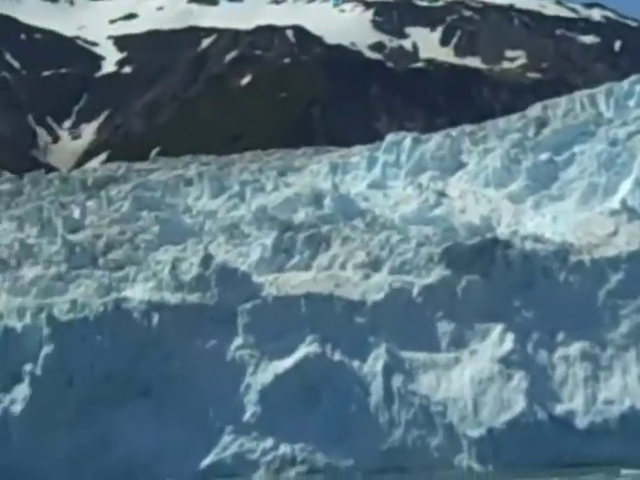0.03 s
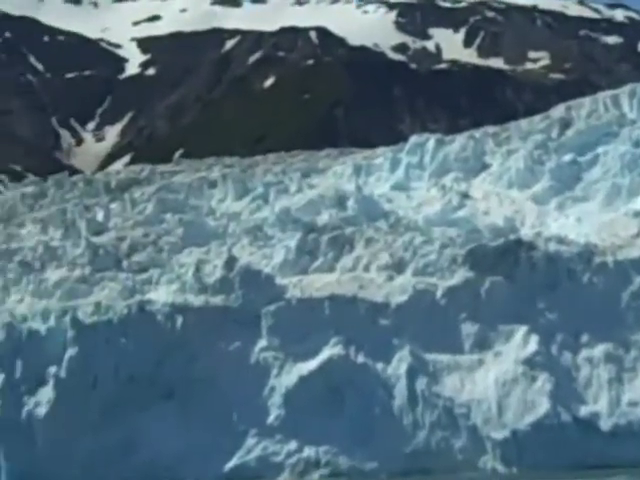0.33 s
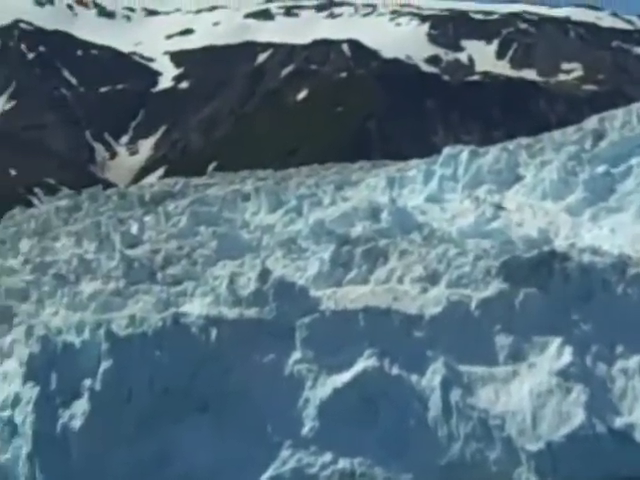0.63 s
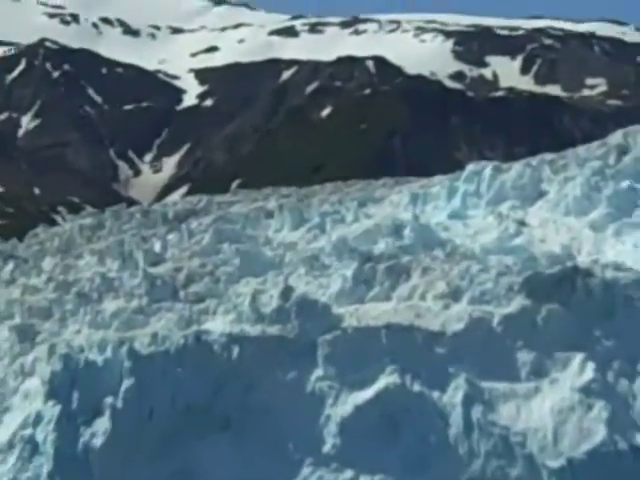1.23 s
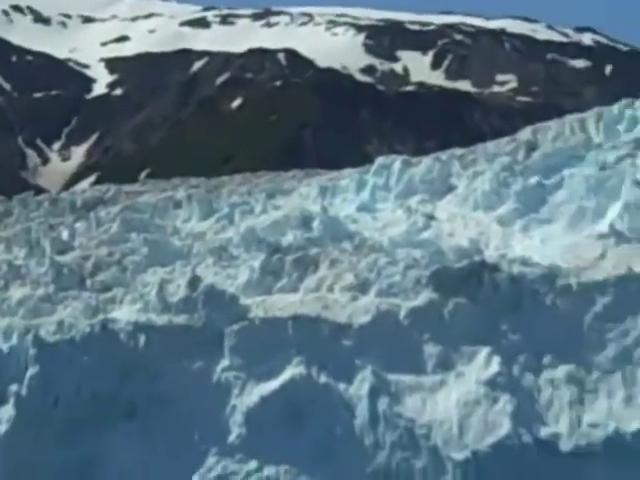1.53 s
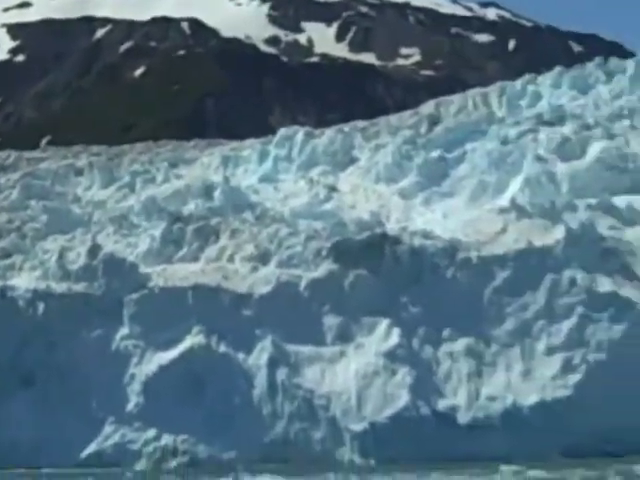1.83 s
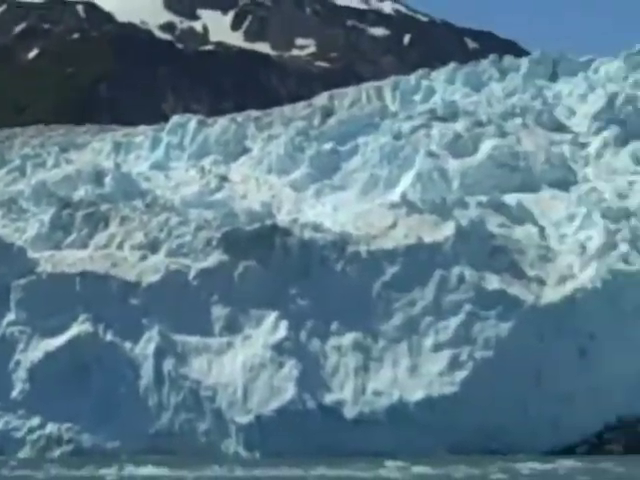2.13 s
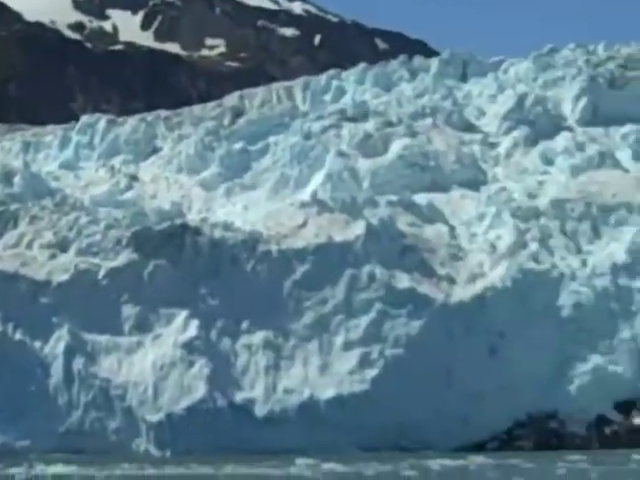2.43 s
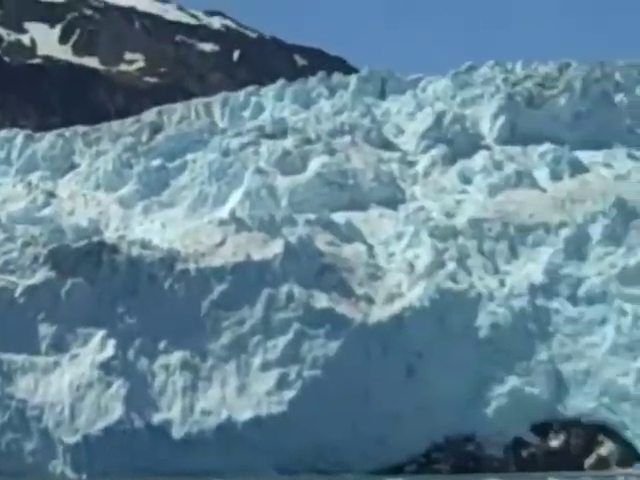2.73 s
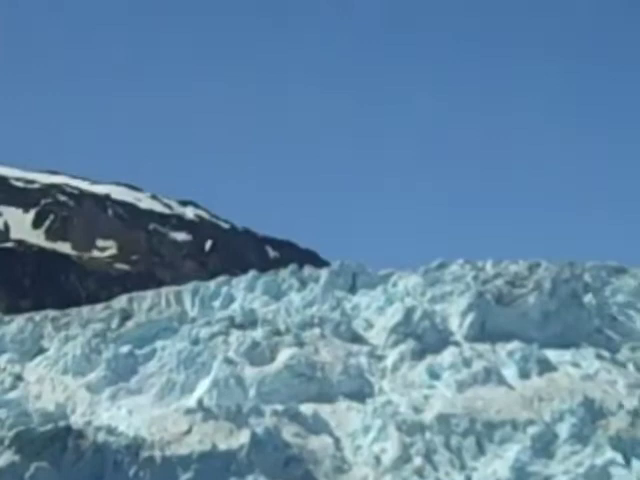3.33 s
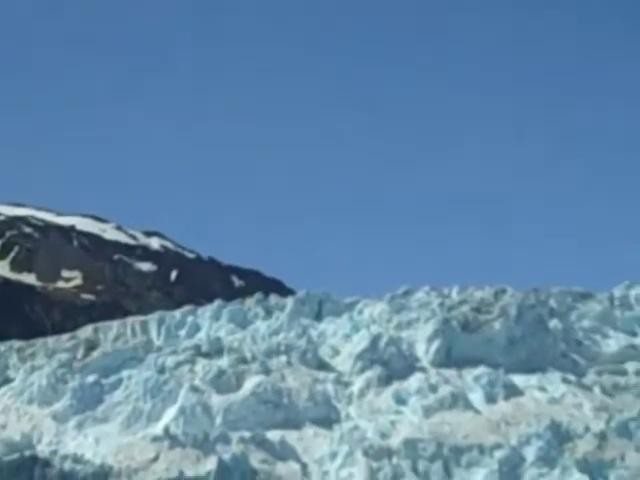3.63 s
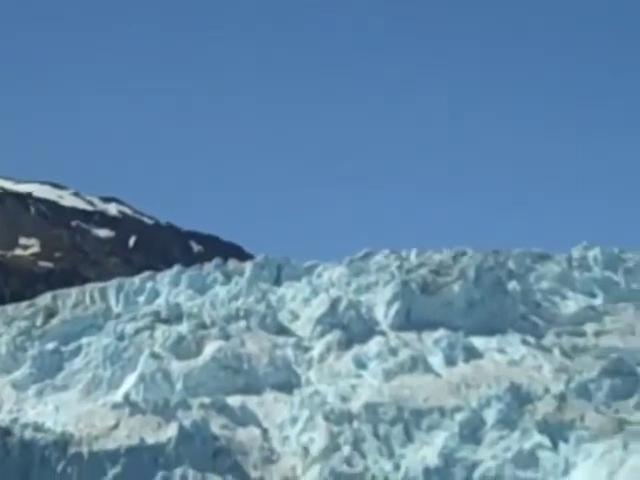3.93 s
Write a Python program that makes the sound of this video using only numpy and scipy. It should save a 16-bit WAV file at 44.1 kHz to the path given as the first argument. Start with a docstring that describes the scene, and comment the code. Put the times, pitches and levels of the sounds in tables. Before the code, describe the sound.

Wind rumbles on the microphone over distant water and faint ticking ice.

```python
"""Wind buffets a small microphone: a fluttering rumble, with single eddies thumping on the port,
strongest in the last second. The microphone stands on open water before a glacier. Close by, small
waves slosh and floating ice ticks; farther out the ice crackles faintly, and behind it all lies
the even wash of distant water."""
import sys
import numpy as np
from scipy import signal
from scipy.io import wavfile

SR = 44100
rng = np.random.default_rng(int(sys.argv[2]) if len(sys.argv) > 2 else 0)


def persist_wave(psi):
    """Save psi, clipped to +-1, as 16-bit WAV."""
    counts = np.round(np.clip(psi, -1, 1) * 32767).astype(np.int16)
    wavfile.write(sys.argv[1], SR, np.atleast_2d(counts).T)


N = 176400
TIME = np.arange(N) / SR

# wind strength at the microphone: t/s, level/dB
GUST_LEVEL = [(0, -53.5), (.12, -57), (.19, -55.5), (.26, -54), (.33, -57.5), (.38, -55), (.51, -58.5),
              (.59, -55), (.72, -58), (.8, -51), (.88, -61), (.97, -51), (1.07, -57.5), (1.13, -54),
              (1.22, -59), (1.28, -54.5), (1.38, -60.5), (1.44, -53.5), (1.57, -51.5), (1.63, -60.5),
              (1.8, -61.5), (1.93, -57.5), (2.01, -64), (2.11, -52.5), (2.2, -51.5), (2.3, -57),
              (2.39, -51.5), (2.47, -56.5), (2.53, -52), (2.59, -56.5), (2.68, -62.5), (2.77, -67),
              (2.86, -54.5), (2.97, -53), (3.08, -48), (3.14, -46.5), (3.23, -48.5), (3.32, -46.5),
              (3.345, -56.5), (3.43, -49), (3.57, -47), (3.61, -44.5), (3.7, -44.5), (3.82, -45),
              (3.88, -48.5), (4, -50)]
# colour of the wind rumble: f/Hz, relative density/dB
RUMBLE_SPECTRUM = [(25, -26.5), (55, -18.5), (92, -3.5), (122, -2.5), (170, 2.5), (260, -2), (420, -8),
                   (560, -13.5), (750, -15), (1400, -25), (3000, -45.5), (8000, -56.5)]
# swell of the rumble's deep end: t/s, gain/dB
DEEP_SWELL = [(0, 0.5), (.6, 4.5), (.9, -4), (1.35, -5.5), (1.7, 1), (2.15, 8), (2.45, 5), (2.7, -9),
              (3.1, -2), (3.65, -5.5), (4, 3)]
# strong eddies crossing the port: t/s, depth of the pressure dip/dB, half width/ms
STRONG_EDDIES = [(.074, -39, 1.2), (.462, -33, 1.14), (.656, -39, 1.3), (.761, -37.5, 1.35),
                 (.793, -38.5, 1.24), (1.024, -36.5, 1.4), (1.040, -36.5, 1.26), (1.880, -35.5, 1.07),
                 (2.091, -35.5, 0.93), (2.112, -37, 1.35), (2.137, -33, 1.73), (2.224, -34.5, 1.14),
                 (2.256, -30.5, 1.17), (2.264, -31.5, 0.39), (2.378, -38.5, 1.9), (2.413, -41.5, 1.4),
                 (3.030, -34, 1.1), (3.072, -35, 1.07), (3.102, -37, 1.5), (3.174, -31, .78),
                 (3.207, -31, 0.58), (3.218, -37, 1.7), (3.279, -33.5, 0.42), (3.317, -32.5, 0.41),
                 (3.322, -34, 0.21), (3.326, -35.5, 0.31), (3.384, -31, .62), (3.396, -32, 0.2),
                 (3.397, -32.5, 1.63), (3.505, -32.5, 0.28), (3.525, -33.5, 0.5), (3.558, -40, 2.7),
                 (3.616, -36, 1.2), (3.640, -31.5, .4), (3.653, -27.5, 1.2), (3.669, -34.5, 0.19),
                 (3.687, -30.5, 1.5), (3.695, -29.5, 1.55), (3.706, -34.5, 1.25), (3.718, -30, .75),
                 (3.731, -36, 1.5), (3.767, -26.5, 0.53), (3.774, -31, 0.61), (3.790, -26.5, 1.02),
                 (3.798, -33, 0.41), (3.832, -31.5, 1.03), (3.836, -28, 0.3), (3.916, -35.5, 1.3),
                 (3.997, -31.5, 0.58)]
# small waves nearby: t/s, level/dB, length/s
NEAR_WAVES = [(0.719, -50.5, 0.015), (0.792, -52.5, 0.023), (1.436, -54, 0.023), (1.598, -48, 0.009),
              (1.708, -56, 0.042), (1.843, -51, 0.023), (2.253, -53.5, 0.05), (2.48, -59.5, 0.17),
              (2.82, -56.5, 0.48), (2.994, -58, 0.042)]
# colour of their splashing: f/Hz, relative density/dB
SLOSH_SPECTRUM = [(100, -32.5), (400, 0.5), (620, 7), (900, -0.5), (1400, 4), (2200, -23.5), (4000, -20),
                  (8000, -40.5)]
# pops close by, from the nearby ice and, at 2.78-2.86 s, from the fizz of a splashing wave: t/s, ring level/dB,
# f/Hz, snap relative to the ring/dB
NEAR_TICKS = [(.070, -60, 5900, -14), (0.541, -51.5, 3500, -2), (0.724, -45.5, 1400, -12),
              (1.256, -62, 6200, 4), (1.498, -49, 3660, -22), (1.601, -52, 3020, -12),
              (1.809, -50.5, 3460, -18), (2.632, -46.5, 2700, -1), (2.644, -62, 6500, 4),
              (2.778, -55, 3500, -16), (2.852, -56, 4500, -16), (2.864, -61, 5670, -18),
              (2.971, -62, 6700, 1), (3.306, -51, 3330, 2), (3.570, -43, 2930, -20), (3.855, -58, 5300, 0),
              (3.978, -60, 5500, 3)]
# colour of the distant water: f/Hz, relative density/dB
WASH_SPECTRUM = [(25, -13), (70, -9), (160, -3), (300, 0.5), (470, 0), (620, 2), (800, -1.5), (1200, -1.95),
                 (2000, -7.5), (3200, -14), (5000, -23.5), (7400, -32.5), (8600, -40.5)]
# loudness of the distant water: t/s, level/dB
FAR_WATER_LEVEL = [(0, -55.5), (.7, -55), (1.2, -56), (1.7, -55), (2.2, -54.5), (2.6, -55.5), (3.0, -54.5),
                   (4, -54.5)]

GUST_MEAN_DB, RUMBLE_GAIN_DB = -49.5, 2.0
GUST_BRIGHTENS, PIVOT_HZ = 0.21, 190   # dB per octave about the pivot, for each dB of gust
FLUTTER_DB, FLUTTER_PER_S, DEEP_BELOW_HZ = 2, 63, 116
SMALL_EDDIES_PER_S, SMALL_EDDY_ABOVE_GUST_DB, SMALL_EDDY_MS = 90, 1, 0.52
PORT_LOW_CUT_HZ = 90
TICK_RISE_S, TICK_RING_S, TICK_SNAP_S = 0.00056, 0.00057, 0.0024
CRACKLES_PER_S, CRACKLE_BASE_DB, CRACKLE_SPREAD_DB, CRACKLE_DB_PER_OCTAVE = 130, -61, 4, -1


def wind_rumble(gust_db):
    """Turbulence on the port flutters in all bands at once and brightens as the wind rises."""
    drive_db = gust_db - GUST_MEAN_DB + FLUTTER_DB * drift(FLUTTER_PER_S)
    deep_db = in_time(DEEP_SWELL)   # the deep end swells on its own
    out = 0
    for hz, band in zip(*noise_bands(RUMBLE_SPECTRUM)):
        sensitivity = 1 + GUST_BRIGHTENS * np.clip(np.log2(hz / PIVOT_HZ), -2, 2)
        deep_share = 1 / (1 + (hz / DEEP_BELOW_HZ) ** 6)
        out = out + band * from_db(sensitivity * drive_db + deep_share * deep_db)
    return from_db(GUST_MEAN_DB + RUMBLE_GAIN_DB) * out


def eddies(gust_db):
    """A vortex on the port is a pressure dip between two small rises: wide ones thump, narrow slap."""
    gap, strength, width = rng.random((400, 3)).T
    times = np.cumsum(-np.log(gap)) / SMALL_EDDIES_PER_S
    depths_db = np.interp(times, TIME, gust_db) + SMALL_EDDY_ABOVE_GUST_DB + 6 * (strength - .5)
    small_eddies = list(zip(times, depths_db, SMALL_EDDY_MS * 4 ** (width - .5)))
    out, ms = np.zeros(N), np.arange(-15, 15, 1000 / SR)
    for s, db, half_width_ms in list(STRONG_EDDIES) + small_eddies:
        offset = ms / half_width_ms
        dip = (offset ** 2 - 1) * np.exp(-.5 * offset ** 2)
        add(out, s - len(ms) / 2 / SR, from_db(db) * dip)
    return signal.sosfilt(signal.butter(2, PORT_LOW_CUT_HZ, "high", fs=SR, output="sos"), out)


def sloshes():
    """Each small wave near the microphone is a brief swell of mid-range splashing."""
    swell = sum(from_db(db) * np.exp(-(2 * (TIME - s) / length) ** 2) for s, db, length in NEAR_WAVES)
    _, bands = noise_bands(SLOSH_SPECTRUM)
    return swell * bands.sum(0)


def near_ticks():
    """Floating ice and splashing water pop close by: a short ring and a snap, faint for bubbles and strong for
    cracks."""
    out, t = np.zeros(N), TIME[:SR // 40]
    swell = (1 - np.exp(-(t / TICK_RISE_S) ** 2)) * np.exp(-t / TICK_RING_S)
    for s, db, hz, snap_db in NEAR_TICKS:
        tone = swell / swell.max() * np.sin(2 * np.pi * hz * t)
        burst = rng.standard_normal(len(t)) * np.exp(-t / TICK_SNAP_S)
        snap = signal.sosfilt(signal.butter(1, [hz / 2, hz * 1.4], "band", fs=SR, output="sos"), burst)
        add(out, s, from_db(db) * (tone + from_db(snap_db) * snap))
    return out


def ice_crackle():
    """Ice farther out pops at random, each pop ringing briefly, the high ones fainter."""
    levels_db = CRACKLE_BASE_DB + CRACKLE_SPREAD_DB * np.minimum(rng.exponential(1, N), 4)
    polarity = rng.choice([-1, 1], N)
    pops = from_db(levels_db) * polarity * (rng.random(N) < CRACKLES_PER_S / SR)
    pitches_hz = np.geomspace(900, 5500, 20)
    pitch_index = rng.integers(0, len(pitches_hz), N)
    gains = from_db(CRACKLE_DB_PER_OCTAVE * np.log2(pitches_hz / pitches_hz.mean()))
    return sum(gains[k] * ring(pops * (pitch_index == k), hz, cycles=13)
               for k, hz in enumerate(pitches_hz))


def distant_wash(waver_db=1.01, waver_per_s=9):
    """Far water arrives as an even rush whose bands each waver a little."""
    _, bands = noise_bands(WASH_SPECTRUM)
    rush = sum(band * from_db(waver_db * drift(waver_per_s)) for band in bands)
    return from_db(in_time(FAR_WATER_LEVEL)) * rush


def from_db(db):
    """Decibels to gain."""
    return 10 ** (np.asarray(db) / 20)


def rms_one(x):
    """Scale to unit rms."""
    return x / np.sqrt(np.mean(x ** 2) + 1e-20)


def in_time(rows):
    """Read a curve of (t/s, value) rows at every sample."""
    return np.interp(TIME, *np.transpose(rows))


def drift(per_s):
    """Smooth random wander of rms about 1, drawn every 40 samples."""
    step, settle = 40, 2000
    pole = np.exp(-2 * np.pi * per_s * step / SR)
    noise = rng.standard_normal(N // step + settle + 2)
    slow = signal.lfilter([1], [1, -2 * pole, pole * pole], noise)[settle:]
    return np.interp(np.arange(N) / step, np.arange(len(slow)), rms_one(slow))


def noise_bands(spectrum):
    """Third-octave bands of noise that sum to rms 1: (centres/Hz, bands)."""
    edges = 22 * 2 ** (np.arange(28) / 3)
    centres = np.sqrt(edges[1:] * edges[:-1])
    hz, db = np.transpose(spectrum)
    gains = from_db(np.interp(np.log(centres), np.log(hz), db))
    bands = np.zeros((len(centres), N))
    for k, gain in enumerate(gains):
        bandpass = signal.butter(2, edges[k:k + 2], "band", fs=SR, output="sos")
        bands[k] = gain * signal.sosfilt(bandpass, rng.standard_normal(N))
    return centres, bands / bands.sum(0).std()


def ring(clicks, hz, cycles):
    """Each click rings as a sine that falls 60 dB in so many cycles."""
    decay = from_db(-60 * hz / (cycles * SR))
    angle = 2 * np.pi * hz / SR
    return signal.lfilter([0, np.sin(angle)], [1, -2 * decay * np.cos(angle), decay ** 2], clicks + 1e-18)


def add(out, s, sound):
    """Mix a sound in from time s."""
    start = int(s * SR)
    first, end = max(start, 0), min(start + len(sound), N)
    if end > first:
        out[first:end] += sound[first - start:end - start]


def scene():
    """One microphone in the wind, over water and floating ice."""
    gust_db = in_time(GUST_LEVEL)
    wind = wind_rumble(gust_db) + eddies(gust_db)
    water = distant_wash() + sloshes()
    ice = near_ticks() + ice_crackle()
    return (wind + water + ice)[None]


def record(dry):
    """The recorder cuts the treble steeply, 50 dB down from 9050 Hz up."""
    return signal.sosfilt(signal.cheby2(12, 50, 9050, fs=SR, output="sos"), dry)


dry = scene()
out = record(dry)
persist_wave(out)
```